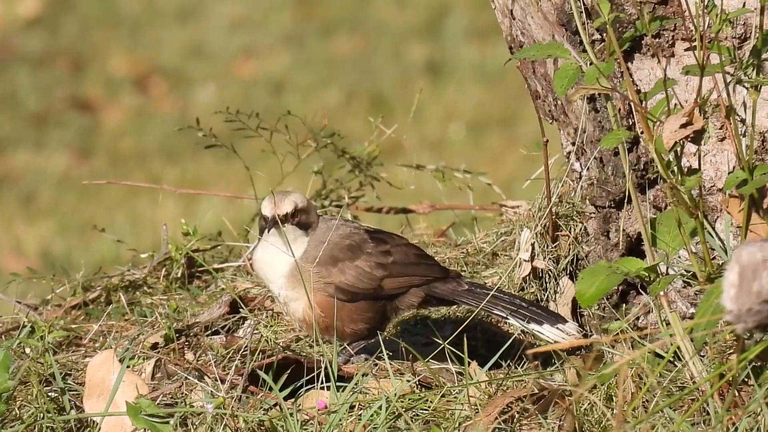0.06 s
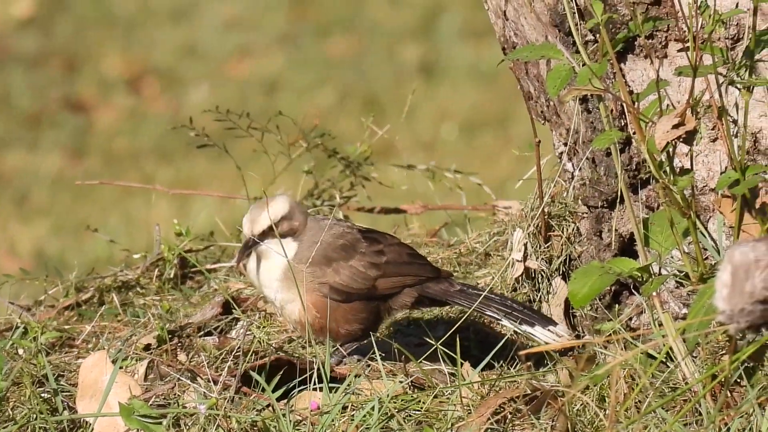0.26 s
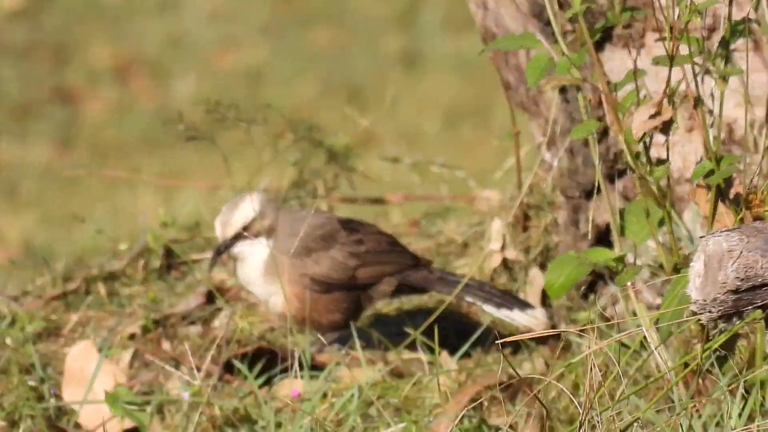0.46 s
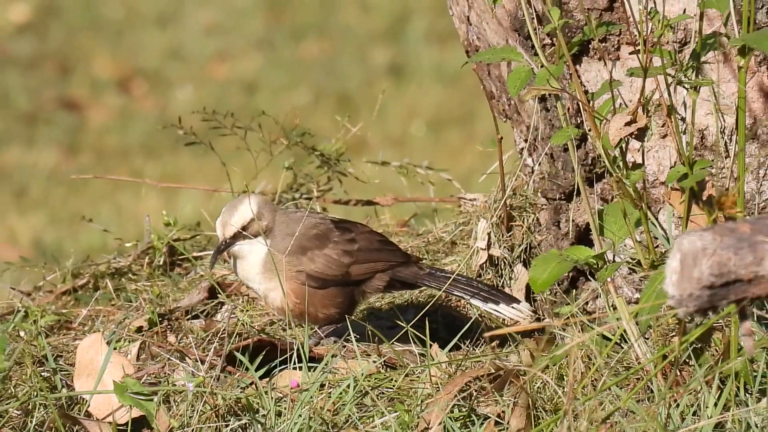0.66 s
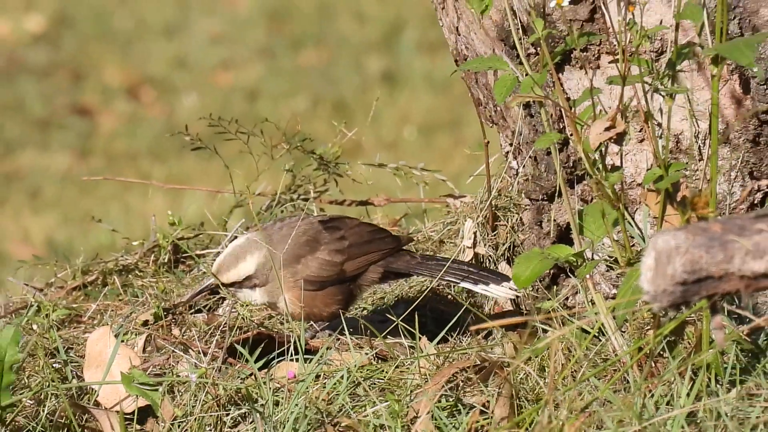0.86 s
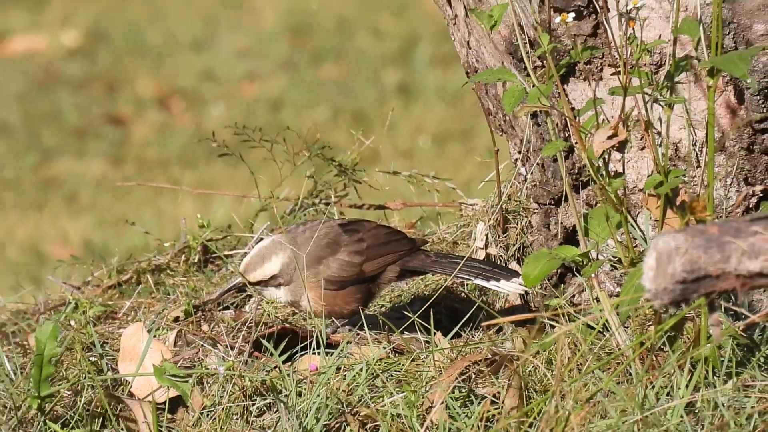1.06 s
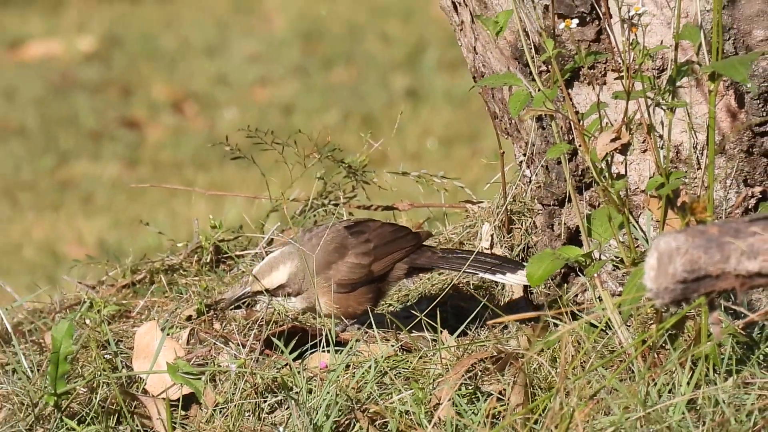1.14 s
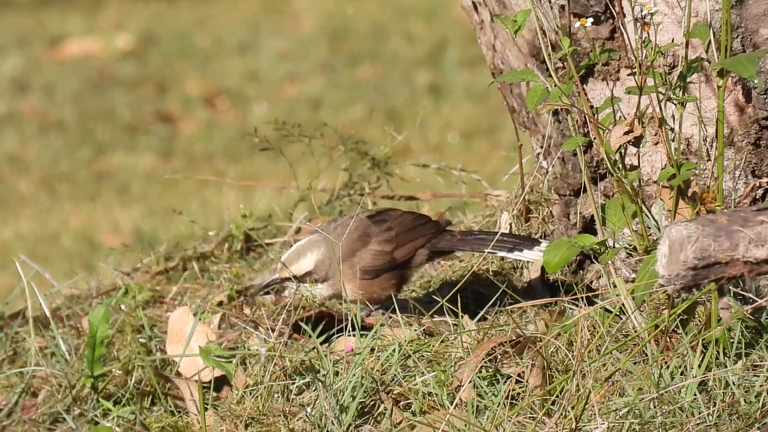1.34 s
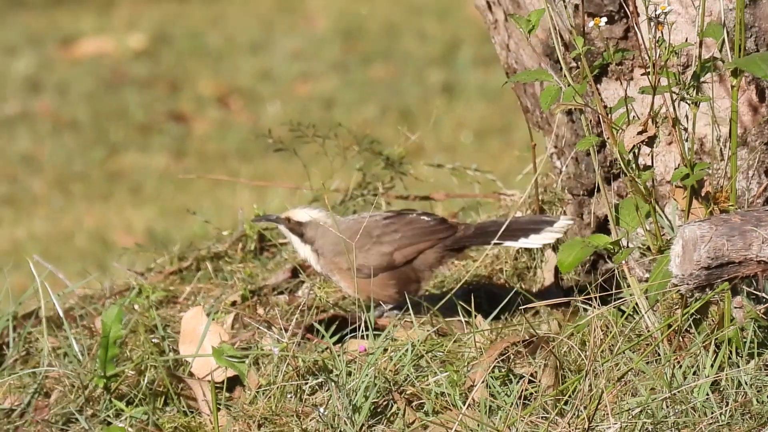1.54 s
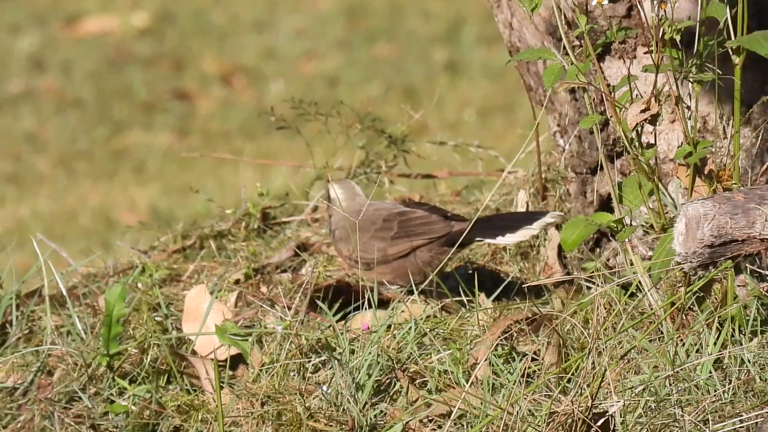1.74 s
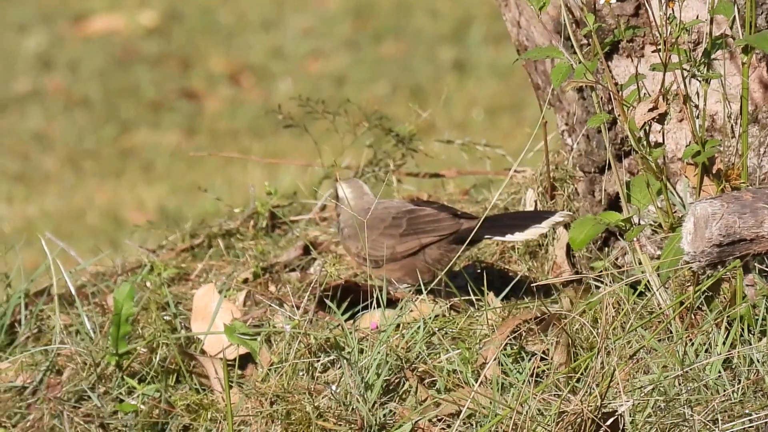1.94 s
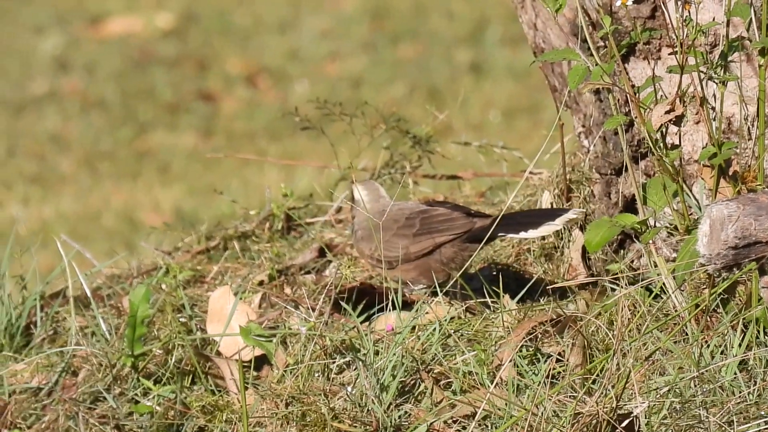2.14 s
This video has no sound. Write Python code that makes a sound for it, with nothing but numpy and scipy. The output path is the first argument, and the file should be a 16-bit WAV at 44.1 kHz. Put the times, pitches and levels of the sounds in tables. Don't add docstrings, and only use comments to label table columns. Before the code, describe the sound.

A babbler close to a stereo microphone gives four loud, shrill, slightly raspy calls in quick succession, each ending in a fast downward slur; then only faint bird trills, insect buzz, leaf hiss and distant traffic remain.

```python
import sys
import numpy as np
from scipy import signal
from scipy.io import wavfile
from scipy.ndimage import uniform_filter1d, map_coordinates

SR = 44100
rng = np.random.default_rng(int(sys.argv[2]) if len(sys.argv) > 2 else 0)


def attenuation_scalar(level_db):
    decades = np.asarray(level_db, float) / 20
    return 10 ** decades


def generate_wav(signal):
    frames = np.transpose(np.atleast_2d(signal))
    scaled = np.clip(frames, -1, 1) * 32767
    pcm = np.round(scaled).astype(np.int16)
    wavfile.write(sys.argv[1], SR, pcm)


N = 97020
CLOCK = np.arange(N) / SR
SLUR_S = .023
OPEN_PAN_DB = 5.5


def babbler():
    # call start in seconds, slur start in seconds, high voice in Hz,
    # its opening overshoot in Hz, low voice top in Hz.
    calls = [
        (.2168, .410, 4776, 573, 2861),
        (.509, .706, 4725, 330, 2912),
        (.831, 1.033, 4707, 285.5, 2898),
        (1.2135, 1.419, 4680, 378.7, 2884),
    ]
    held, slurs = np.zeros((2, N)), np.zeros((2, N))
    air = breath_noise()
    for k, (start, slur, high_hz, over_hz, low_hz) in enumerate(calls):
        t, hold = CLOCK - start, slur - start
        fall = np.clip((CLOCK - slur) / SLUR_S, 0, 1)
        high = high_pitch(t, fall, high_hz, over_hz)
        low = low_pitch(t, low_hz)
        beat = phase(400 * (1 + 0.0249 * wobble(40)))
        held += high_voice(k, t, hold, high, beat)
        held += low_voice(k, t, hold, low)
        held += tick(t)
        held += mixing_tones(k, t, hold, high, low, beat)
        held += breath(k, t, hold, fall, air)
        slurs += closing_slur(k, CLOCK - slur, fall, high, beat)
    return held, slurs


def high_pitch(t, fall, high_hz, over_hz):
    slur_path = [(0, 0), (.3, .17), (.6, .56), (.78, .68), (1, 1)]
    rise_s, settle_s = .007, .0072
    on = np.clip(t, 0, None)
    rising = over_hz - 1200 * (1 - on / rise_s) ** 2
    settling = over_hz * np.exp(-(np.abs(on - rise_s) / settle_s) ** 1.16)
    hz = high_hz - 207 * on + 6 * wobble(60.54) + np.where(t < rise_s, rising, settling)
    return hz + (2048 - hz) * np.interp(fall, *np.transpose(slur_path))


def low_pitch(t, top_hz):
    on = np.clip(t, 0, None)
    sag = 800 * (on - .045)
    return top_hz - sag - (top_hz - 2450) * np.exp(-(on / 0.01126) ** 2) + 6 * wobble(59.55)


def flutter(k, t, beat, depth_db):
    rasp_db = [-16, -26, -24, -26]
    grown = np.clip(t / .02, 0, 1)
    return 1 + grown * (2 * attenuation_scalar(depth_db) * np.cos(beat) + attenuation_scalar(rasp_db[k]) * wobble(1200))


def high_voice(k, t, hold, hz, beat):
    # time in seconds, level in dB.
    levels = [
        [(.215, -23), (.225, -20), (.238, -23), (.262, -34.5), (.283, -26), (.315, -36.5), (.327, -30.5),
         (.347, -27.5), (.405, -36.5)],
        [(.51, -26), (.516, -20.5), (.525, -19.5), (.531, -41), (.535, -16), (.541, -22.5), (.565, -16.5),
         (.66, -27.5), (.672, -55)],
        [(.832, -30), (.841, -19), (.848, -30), (.872, -19), (.898, -21), (.942, -31.5), (.978, -21),
         (.995, -56), (1.03, -29)],
        [(1.215, -35.5), (1.222, -19.5), (1.237, -20), (1.259, -16.5), (1.285, -18), (1.319, -29), (1.377, -43),
         (1.391, -29), (1.415, -31)],
    ]
    # beading of the tone in dB, flutter depth in dB, left over right while held in dB.
    beads_db = [10, 2.5, 4, 7]
    flutter_db = [-12, -22, -25, -27]
    held_pan_db = [-3, -8, -7.5, -6]
    on = np.clip(t, 0, None)
    deepen = np.clip(0.15 + on / hold, 0, 1)
    beads = beads_db[k] * deepen * (0.59 - np.abs(wobble(70)))
    level = attenuation_scalar(follow(levels[k]) + beads) * flutter(k, t, beat, flutter_db[k])
    pan = held_pan_db[k] + (OPEN_PAN_DB - held_pan_db[k]) * np.exp(-(on / .018) ** 2)
    return gate(t - .002, hold, .004) * level * tone(phase(hz), pan, .89)


def low_voice(k, t, hold, hz):
    # time in seconds, level in dB.
    levels = [
        [(0.215, -40), (0.311, -45.5), (0.349, -34), (0.393, -44), (0.41, -37)],
        [(0.51, -44.5), (0.536, -42), (0.588, -32), (0.598, -35), (0.705, -37)],
        [(0.832, -40), (0.895, -37), (0.935, -30.5), (1.022, -39), (1.035, -30.5)],
        [(1.215, -45.5), (1.237, -37.5), (1.359, -29.5), (1.409, -37), (1.42, -61)],
    ]
    level = attenuation_scalar(follow(levels[k]) + 1.5 * wobble(80.3))
    return gate(t, hold + 0.0073, 0.00063) * level * tone(phase(hz), -5.5, .18)


def tick(t):
    length = 0.0022
    turns = (5350 - 500 * t / length / 2) * t
    return gate(t + 0.00093, length, length / 2) * attenuation_scalar(-33) * tone(2 * np.pi * turns, OPEN_PAN_DB, .5)


def mixing_tones(k, t, hold, high, low, beat):
    mix = [(0, 2), (2, -1), (1, 1), (0, 3), (2, 0), (1, 2), (3, -1), (2, 1), (1, 3), (3, 0), (2, 2)]
    # level in dB, change over the call in dB.
    mix_db = [(-49.5, 0.5), (-50.5, -12), (-43.5, -13), (-61, 8), (-39, -33.5), (-58.5, 2), (-56, -7.5),
              (-56.5, -7.5), (-79, 5), (-61, -38), (-67, -24)]
    out = np.zeros((2, N))
    on = np.clip(t, 0, None)
    high_phase, low_phase = phase(high), phase(low)
    progress = (on.clip(0, hold) / hold) ** 0.81
    for (m, n), (db, change_db) in zip(mix, mix_db):
        uneven = 1.5 * rng.standard_normal() + 4.5 * wobble(70.6)
        level = attenuation_scalar(db + change_db * progress + uneven) * flutter(k, t, beat, -13.5)
        if n and m * n != 1:
            level = level * np.clip(on / .022, .1, 1) ** 2
        audible = np.clip((15600 - m * high - n * low) / 600, 0, 1)
        whistle = tone(m * high_phase + n * low_phase, 4 * wobble(11.65) - 2.5, 1.29)
        out += gate(t, hold + 0.013, 0.0035) * audible * level * whistle
    return out


def breath_noise():
    # frequency in Hz, level in dB.
    colour = [(2000, -120), (2400, -3), (5000, 2.5), (7500, -3.5), (10500, -10.5), (12700, -19),
              (13600, -45), (15700, -58)]
    return rush(colour, patchy_db=3)


def breath(k, t, hold, fall, air):
    breathy_db = [2.8, 0.98, 1.2, 1]
    puff = np.exp(-np.clip(t, 0, None) / 0.0065) + 0.35 * fall
    return air * gate(t, hold + SLUR_S, 0.0017) * (attenuation_scalar(-47.5 + breathy_db[k]) + attenuation_scalar(-34.5) * puff)


def closing_slur(k, t, fall, hz, beat):
    slur_db = [-27.5, -32, -31, -29.5]
    throat = attenuation_scalar(-1 + 3 * fall) + np.exp(-((hz - 3040) / 290) ** 2)
    turns = phase(hz)
    whistle = tone(turns, -1.3, .18) + attenuation_scalar(-27) * tone(2 * turns, -1.5, .3)
    level = attenuation_scalar(slur_db[k] + 3 * wobble(500)) * flutter(k, t + SLUR_S, beat, -13)
    return gate(t, SLUR_S, 0.0023) * level * throat * whistle


def ground(x):
    tail = rng.standard_normal((2, SR // 8)) * attenuation_scalar(-60 * np.arange(SR // 8) / SR / .08)
    late = np.pad(x, ((0, 0), (150, 0)))
    return signal.fftconvolve(late, tail / np.linalg.norm(tail[0]), axes=1)[:, :N]


def trunk_echoes(slurs):
    # delay in seconds, level in dB.
    echoes = [(.005, -13), (.011, -9), (.025, -12)]
    out = np.zeros((2, N))
    for k, (delay, db) in enumerate(echoes):
        out += attenuation_scalar(db) * np.roll(slurs[::(-1) ** k], round(delay * SR), axis=1)
    return out


def trees(x):
    # frequency in Hz, time to fall 60 dB in seconds.
    decay = [(1500, 0.11), (3000, 0.92), (4700, 0.89), (8000, 0.75), (13000, 0.089)]
    hz, t, z = signal.stft(rng.standard_normal((2, SR)), SR, nperseg=256)
    tail = signal.istft(z * attenuation_scalar(-60 * t / along(decay, hz)[:, None]), SR, nperseg=256)[1]
    late = np.pad(x.mean(0), (900, 0))[None]
    return signal.fftconvolve(late, tail / np.linalg.norm(tail[0]), axes=1)[:, :N]


def far_note(start, length, from_hz, to_hz, db):
    t = CLOCK - start
    hz = from_hz + (to_hz - from_hz) * np.clip(t / length, 0, 1) ** 0.582
    return attenuation_scalar(db) * gate(t, length, 0.095 * length) * tone(phase(hz), 1.5, 0.63)


def far_birds():
    # start in seconds, top in Hz, level in dB.
    trill = [(.046, 3950, -59), (.093, 4150, -52), (.142, 4250, -50), (.191, 4200, -51), (.243, 4150, -51),
             (.49, 3900, -49), (.925, 4050, -50), (.975, 4050, -50), (1.11, 3800, -49), (1.31, 3800, -49),
             (1.767, 4150, -54), (1.815, 4300, -51), (1.866, 4350, -52), (1.92, 4150, -53),
             (2.038, 3850, -55), (2.089, 3950, -54), (2.142, 4000, -54)]
    # start in seconds, length in seconds, first pitch in Hz, last pitch in Hz, level in dB.
    whistles = [
        (.13, .09, 2860, 2800, -53),
        (1.8, .055, 2650, 2780, -54),
        (1.898, .031, 3100, 3380, -51),
        (1.898, .029, 4450, 5150, -51),
        (1.924, .009, 6700, 2900, -53),
        (1.97, .05, 1750, 1650, -51),
        (2.115, .05, 1620, 1650, -50),
    ]
    out = np.zeros((2, N))
    for row in whistles:
        out += far_note(*row)
    for start, hz, db in trill:
        out += far_note(start, 0.0157, hz, hz - 544, db)
    return out


def insects():
    # frequency in Hz, level in dB per Hz.
    buzz_colour = [(2000, -120), (2150, 0.5), (2400, 1.5), (2700, -8), (3000, -120)]
    # frequency in Hz, level in dB per Hz.
    sizzle_colour = [(8000, -120), (9000, 1), (10300, -1), (12000, -13), (13500, -120)]
    pulse = 1 + np.sin(2 * np.pi * 120 * CLOCK)
    buzz = pulse * attenuation_scalar(-53.5) * rush(buzz_colour, patchy_db=4.5)
    sizzle = attenuation_scalar(-69.5) * rush(sizzle_colour, patchy_db=5)
    return gate(CLOCK + 1, 2.83, 0.43) * (buzz + sizzle)


def leaves():
    # frequency in Hz, level in dB per Hz.
    colour = [(1120, -38), (1900, -6.5), (2980, -7), (3680, 0), (5320, -10.5), (7110, -10.5),
              (11100, -43.5), (13000, -47)]
    return attenuation_scalar(-52) * rush([(1700, -120)] + colour, patchy_db=4.0)


def traffic():
    # frequency in Hz, level in dB per Hz.
    colour = [(24, -76), (40, -116), (81, -25.5), (128, -35.5), (193, -14), (422, -15), (713, -1),
              (1130, -6.5), (2000, -24), (2600, -73), (4400, -120)]
    # time in seconds, level in dB.
    hum_level = [(0.0, -37.5), (1.16, -37), (1.56, -37.5), (2.2, -36.5)]
    # time in seconds, level in dB.
    rumble_level = [(0.0, -58.5), (0.38, -56), (0.76, -58), (1.05, -56.5), (1.55, -61), (2.2, -54.5)]
    rumble_colour = colour[:5] + [(400, -17.5), (480, -120)]
    hum_colour = [(250, -120), (330, -43.0)] + colour[5:9] + [(2300, -120)]
    rumble = attenuation_scalar(follow(rumble_level) + 5.0) * rush(rumble_colour, patchy_db=3)
    hum = attenuation_scalar(follow(hum_level) + 0.25 + 0.99 * wobble(8.68)) * rush(hum_colour, patchy_db=1.88)
    return rumble + hum


def unit(x):
    return x / np.sqrt(np.mean(x ** 2) + 1e-20)


def along(points, hz):
    f, v = np.transpose(points)
    return np.interp(np.log(hz + 1), np.log(f + 1), v)


def follow(points):
    return np.interp(CLOCK, *np.transpose(points))


def phase(hz):
    return 2 * np.pi * np.cumsum(hz) / SR


def wobble(rate):
    coarse = np.arange(0, N + 8, 8)
    knots = rng.standard_normal(int(N * rate / SR) + 4)
    return np.interp(np.arange(N), coarse, map_coordinates(knots, [coarse * rate / SR]))


def rush(spectrum, patchy_db):
    # frequency in Hz, left-right likeness from 0 to 1.
    alike = [(60, 0.99), (180, 0.98), (550, 0.98), (1650, 0.84), (4970, 0.027), (15000, 0.11)]
    hz, _, z = signal.stft(rng.standard_normal((2, N)), SR, nperseg=2048)
    field = rng.standard_normal(z.shape[1:])
    field = uniform_filter1d(uniform_filter1d(field, 8, 0), 3, 1)
    turn = np.arccos(np.clip(along(alike, hz), -1, 1)) / 2
    colour = attenuation_scalar(along(spectrum, hz)) * [np.cos(turn), np.sin(turn)]
    shaped = z * colour[..., None] * attenuation_scalar(patchy_db * unit(field))
    mid, side = signal.istft(shaped, nperseg=2048)[1][:, :N]
    return unit(np.array([mid + side, mid - side]))


def gate(t, length, edge):
    return np.sin(np.pi / 2 * np.clip(np.minimum(t, length - t) / edge, 0, 1)) ** 2


def tone(turns, pan_db, lead):
    side = np.array([[.5], [-.5]])
    return 2 ** .5 * attenuation_scalar(side * pan_db) * np.sin(turns + side * lead)


def scene():
    held, slurs = babbler()
    far = attenuation_scalar(3) * far_birds()
    near = attenuation_scalar(-13) * ground(held) + attenuation_scalar(-1) * ground(slurs) + trunk_echoes(slurs)
    sway = 1.5 * wobble(59.88)
    tail = attenuation_scalar(-12 + sway) * trees(held + attenuation_scalar(4) * slurs)
    far_tail = attenuation_scalar(-9) * trees(far)
    return held + slurs + near + tail + far + far_tail + traffic() + leaves() + insects()


def roll_off(x):
    return signal.sosfilt(signal.butter(12, 15690, fs=SR, output="sos"), x)


def record(dry):
    return roll_off(dry)


dry = scene()
out = record(dry)
generate_wav(out)
```